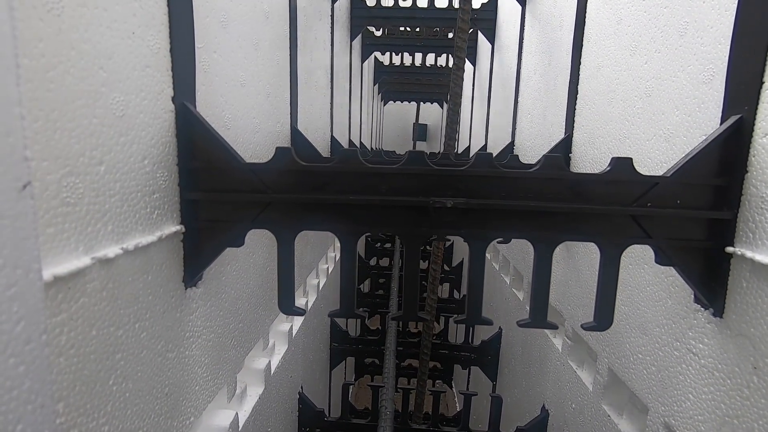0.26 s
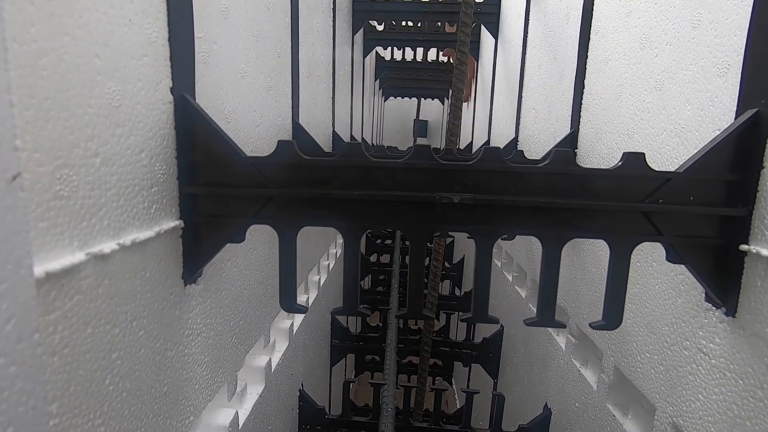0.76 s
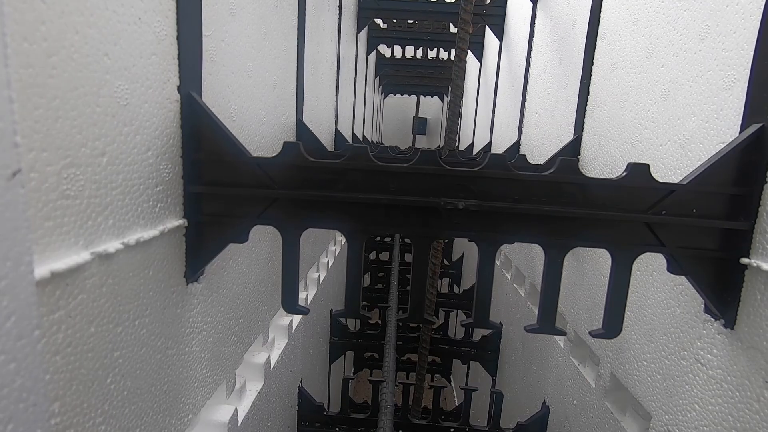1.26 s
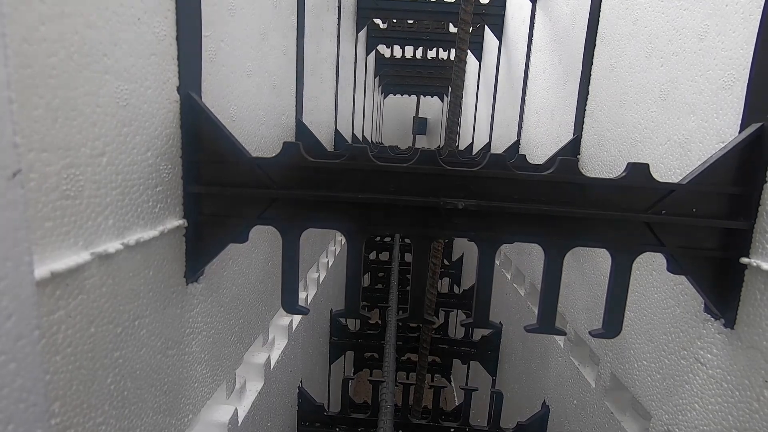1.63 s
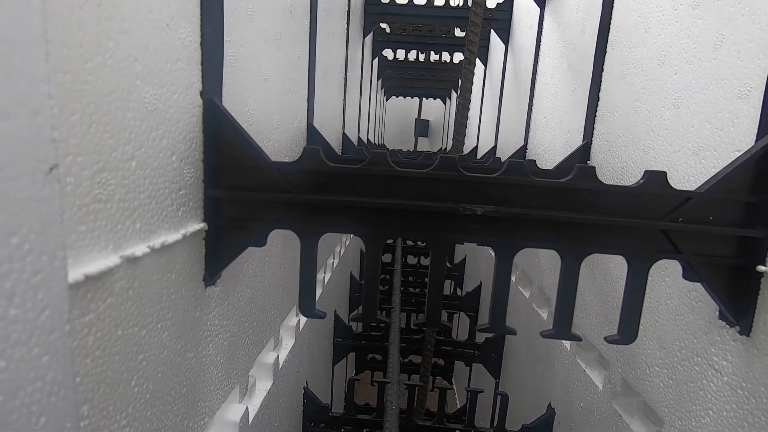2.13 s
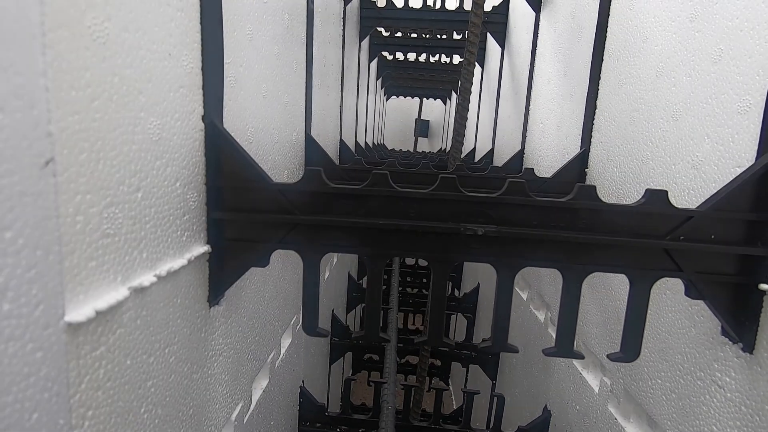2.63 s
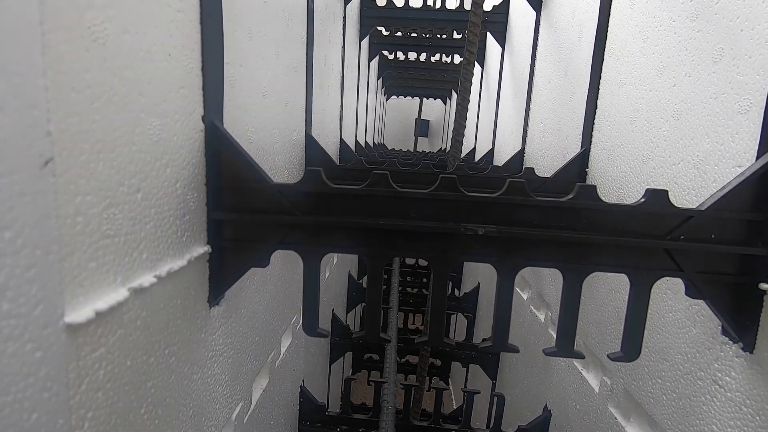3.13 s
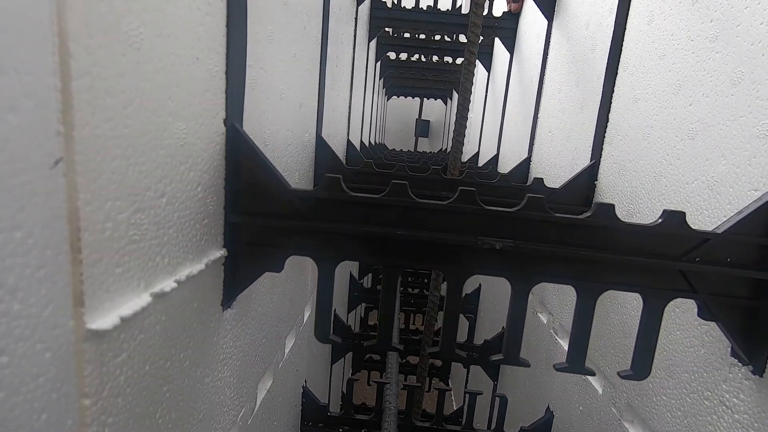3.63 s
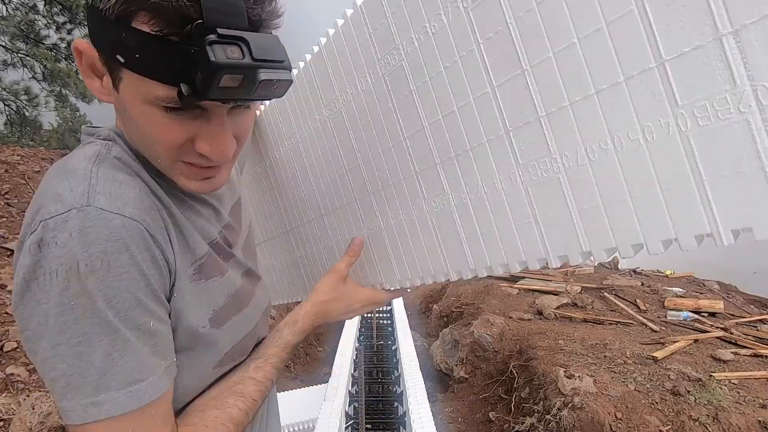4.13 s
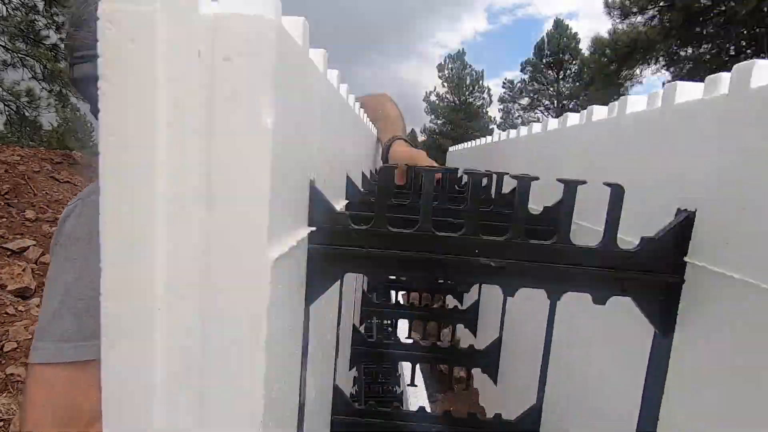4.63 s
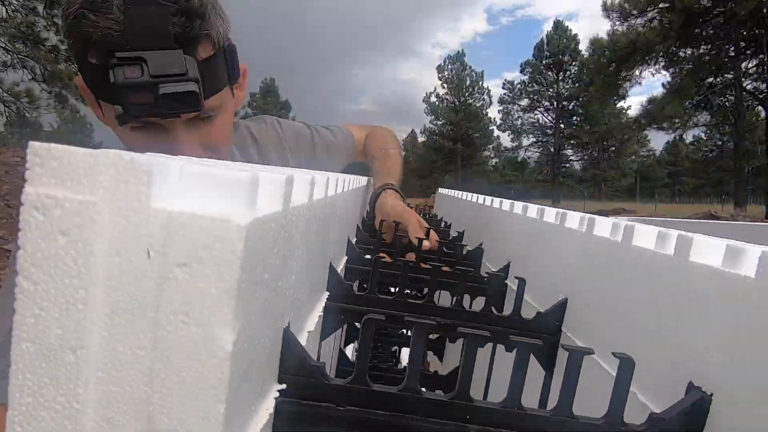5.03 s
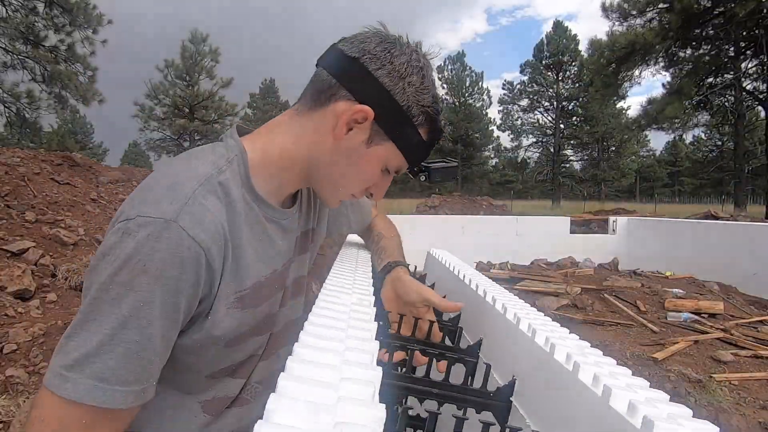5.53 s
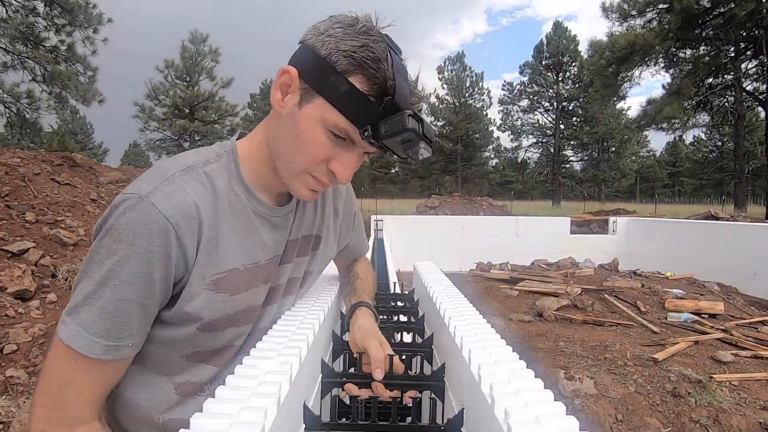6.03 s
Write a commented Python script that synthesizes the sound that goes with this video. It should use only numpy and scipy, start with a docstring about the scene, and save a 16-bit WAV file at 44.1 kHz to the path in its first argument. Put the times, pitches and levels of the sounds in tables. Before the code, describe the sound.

Loud irregular clacks and gritty scraping fill a narrow foam channel, the walls ringing low and boxy, with dry plastic ticks close to the microphone. Then an abrupt change to a drier outdoor site: a foam block is set down and pressed home with muffled bumps, low rumbling, crunchy rubs, tiny squeaks, sleeve rustle and light wind.

```python
"""Foam hisses and judders as a steel bar is worked along plastic webs inside a hollow foam wall form.
Bead slips make the hiss, knocks ring damped panels and boom in cavity modes, plastic creaks close by.
From 4.17 s, in the open air, a foam block is set on the wall and pressed home: resonant dull bumps,
rubbing, rumbling teeth, small squeaks and a sleeve rustle, over a breeze of coloured noise."""
import sys
import numpy as np
from scipy import signal
from scipy.fft import rfft, irfft, next_fast_len
from scipy.io import wavfile
from scipy.ndimage import uniform_filter1d, map_coordinates

SR = 44100
rng = np.random.default_rng(int(sys.argv[2]) if len(sys.argv) > 2 else 0)


def output_pcm(signal):
    """Save a mono or channel-first signal as 16-bit PCM at the path in sys.argv[1].

    Samples are clipped to [-1, 1] before scaling.
    """
    pcm = np.clip(np.atleast_2d(signal).T, -1, 1) * 32767
    wavfile.write(sys.argv[1], SR, np.round(pcm).astype(np.int16))


N = 276507

# strokes of the bar along foam and webs: start_s, end_s, swell_db (start to end), hiss_db, drag_db
BAR_STROKES = [(0.0, 0.12, -3, -38, -31.5), (0.162, 0.36, -0.5, -42, -37), (0.356, 0.558, -7, -61, -50),
               (0.587, 0.654, -2, -48, -25), (0.694, 0.836, -2, -52.5, -40.5), (0.851, 0.954, 3, -48, -42),
               (0.976, 1.114, 9, -43, -37), (1.12, 1.202, -1, -50.5, -37),
               (1.248, 1.278, -12.5, -41, -27.5), (1.284, 1.45, 10, -46.5, -34),
               (1.432, 1.479, -7, -39.5, -44), (1.557, 1.607, 0.5, -42.5, -37),
               (1.697, 1.738, -8, -47, -40), (1.768, 1.826, -9.5, -42.5, -32.5),
               (1.835, 1.931, 3.5, -50, -37), (1.977, 2.131, 2.5, -42, -33.5),
               (2.14, 2.203, 2.5, -45.5, -30), (2.232, 2.243, 4, -50.5, -35),
               (2.299, 2.438, -4.5, -46.5, -70), (2.511, 2.58, -20.5, -44.5, -48),
               (2.61, 2.618, 0, -57, -47), (2.665, 2.757, 6, -51, -43.5), (2.856, 2.967, -5, -45, -32),
               (3.015, 3.039, -1.5, -38, -49), (3.076, 3.22, -6, -49.5, -35.5),
               (3.223, 3.268, -2, -50, -30.5), (3.296, 3.308, -2, -43.5, -36),
               (3.406, 3.478, -10, -42, -29), (3.513, 3.562, -10, -50.5, -66), (3.621, 3.656, 9, -45, -44),
               (3.755, 3.86, 13, -46.5, -46), (3.924, 4.015, -1.5, -40.5, -34.5),
               (4.06, 4.119, 6, -44, -51), (4.147, 4.187, 3, -50, -61)]
# air and wall resonances of the cavity: mode_hz, width_hz, level_db
CAVITY_MODES = [(132.3, 20, -12), (237, 41.5, -0.5), (314.8, 81, -4), (395.2, 20, 1), (567, 64, -9),
                (698.6, 84, -6.5), (817, 120, -8), (1018, 380, -18.5)]
# colour of bead hiss: freq_hz, density_db
BEAD_COLOUR = [(500, 8.5), (1200, 1.5), (2200, 0.5), (4000, 6.5), (5000, 3), (7500, 2.5), (10300, 0),
               (12000, -4), (16000, -4.5)]
# colour of a rubbed panel: freq_hz, density_db
PANEL_COLOUR = [(60, -57), (180, -6.5), (300, 2), (480, -4.5), (730, 2), (870, -7.5), (1000, -4.5),
                (1550, -15), (2600, -35)]

STROKE_RISE_S, STROKE_FALL_S, DRAG_FALL_S = 0.024, 0.045, 0.2  # 60 dB times
PUSH_RISE_S, PUSH_FALL_S = 0.11, 0.11  # 60 dB times
RESTING_DB = -68  # foam or sleeve that is only held


def amp(db):
    """Decibels to gain."""
    return 10 ** (np.asarray(db) / 20)


def unit(x):
    """Scale to rms 1."""
    return x / np.sqrt(np.mean(x ** 2) + 1e-20)


def along(points, hz):
    """(Hz, value) points read on a log axis."""
    f, v = np.transpose(points)
    return np.interp(np.log(hz + 1), np.log(f), v)


def wobble(rate_hz):
    """Smooth random curve with rate_hz knots a second."""
    return map_coordinates(rng.standard_normal(int(N * rate_hz / SR) + 4), [np.arange(N) * rate_hz / SR])


def filtered(x, response):
    """x times a response of frequency."""
    n = x.shape[-1]
    m = next_fast_len(n + 8192)
    return irfft(rfft(x, m) * response(np.fft.rfftfreq(m, 1 / SR)), m)[..., :n]


def coloured(x, spectrum):
    """x shaped by (Hz, dB) points, at rms 1."""
    return unit(filtered(x, lambda hz: amp(along(spectrum, hz))))


def resonances(modes, hz):
    """Response of a body with (Hz, width Hz, dB) modes of alternating sign."""
    total = 0
    for k, (centre, width, db) in enumerate(modes):
        damping = 1j * hz * width
        total = total + (-1) ** k * amp(db) * damping / (centre * centre - hz * hz + damping)
    return total


def grains(rate_hz, spread_db):
    """Tiny slips at random times, of random sign and log-normally spread size, at rms 1."""
    happens = rng.random(N) < rate_hz / SR
    return unit(happens * rng.standard_normal(N) * amp(spread_db * rng.standard_normal(N)))


def fade(t, t60):
    """Gain that falls 60 dB in t60."""
    return np.exp(-np.log(1000) * t / t60)


def add(track, s, sound):
    """Mix a sound into a track at s seconds; a negative start is moved to zero."""
    part = track[..., max(round(s * SR), 0):][..., :sound.shape[-1]]
    part += sound[..., :part.shape[-1]]


def moves(rows, rise_s, fall_s):
    """Gain of hand moves (start_s, end_s, swell_db, level_db): each sets in, swells evenly, dies away."""
    power = np.zeros(N)
    for start, end, swell_db, db in rows:
        t = np.arange(max(start - rise_s, 0), end + fall_s, 1 / SR)
        progress = np.interp(t, [start, end], [-.5, .5])
        edges = fade(np.maximum(start - t, 0), rise_s) * fade(np.maximum(t - end, 0), fall_s)
        add(power, t[0], (amp(db + swell_db * progress) * edges) ** 2)
    return np.sqrt(power)


def patchy(x, depth_db, band_size, time_size):
    """x with its colour shifting from moment to moment; sizes count 170 Hz bands and 3 ms frames."""
    z = signal.stft(x, nperseg=256)[2]
    field = rng.standard_normal(z.shape)
    for axis, size in 2 * [(0, band_size), (1, time_size)]:
        field = uniform_filter1d(field, size, axis, mode="wrap")
    return unit(signal.istft(z * amp(depth_db * unit(field)), nperseg=256)[1][:len(x)])


def between_walls(x, t60, echo_db):
    """Close reflections between the panels comb the sound."""
    t = np.arange(SR // 30) / SR
    echoes = rng.standard_normal(len(t)) * fade(t, t60)
    return unit(x + amp(echo_db) * unit(signal.fftconvolve(x, echoes)[:N]))


def friction(inside):
    """How hard foam is being rubbed, by the bar or by the block."""
    # rubs of the block on the course below: start_s, end_s, swell_db, hiss_db
    rubs = [(4.246, 4.262, -1, -41), (4.28, 4.304, 8, -48.5), (4.32, 4.64, 3, -60), (4.857, 4.885, -5, -33),
            (4.9, 4.93, -2, -44.5), (4.943, 4.963, 2, -36.5), (5.04, 5.09, 0, -43), (5.12, 5.14, 4, -43),
            (5.228, 5.255, 1, -50), (5.345, 5.42, -6, -49.5), (5.467, 5.505, -12, -51),
            (5.516, 5.54, -1, -36), (5.55, 5.583, -6, -53.5), (5.67, 5.75, -4, -43.5),
            (5.78, 6.085, -4, -41.3), (6.09, 6.18, 0, -40)]
    strokes = [(start, end, swell, hiss) for start, end, swell, hiss, drag in BAR_STROKES]
    held = amp(RESTING_DB) * (1 - inside / 2)
    return moves(strokes + list(rubs), STROKE_RISE_S, STROKE_FALL_S) + held


def rubbing(inside, pressure, hiss_db=-1, bar_flutter_db=1.3, block_flutter_db=2.0):
    """Beads catch and slip thousands of times a second, less evenly under the block; inside, a panel roars."""
    beads = between_walls(grains(9000, spread_db=3.2), t60=.03, echo_db=-8)
    shifting = patchy(beads, depth_db=2.5, band_size=7, time_size=8)
    roar = inside * coloured(grains(2600, spread_db=3.0), PANEL_COLOUR)
    flutter_db = (bar_flutter_db * inside + block_flutter_db * (1 - inside)) * wobble(120)
    return pressure * amp(hiss_db + flutter_db) * (coloured(shifting, BEAD_COLOUR) + roar)


def drag_force():
    """How hard the bar drags on the webs."""
    drags = [(start, end, swell, drag) for start, end, swell, hiss, drag in BAR_STROKES]
    return moves(drags, STROKE_RISE_S, DRAG_FALL_S)


def dragging(force, drag_db=-3, judder_db=5.0, ring_db=-7):
    """The bar sticks and slips on the webs; the panels answer and the cavity rings."""
    slips = grains(1500, spread_db=0.5) * amp(judder_db * wobble(40))
    panels = coloured(slips, PANEL_COLOUR)
    cavity = unit(filtered(slips, lambda hz: resonances(CAVITY_MODES, hz)))
    return force * (amp(drag_db) * panels + amp(ring_db) * cavity)


def wall_shake(force, shake_db=-1, follow_db=-18, hold_s=0.015):
    """The whole wall rumbles: a little while the bar drags, more after each jolt."""
    # jolts of the wall: start_s, level_db
    jolt_rows = [(0.385, -47), (1.1, -35), (1.6, -42), (2.06, -36.5), (2.5, -25.5), (2.56, -43),
                 (3.07, -34), (3.23, -33), (3.42, -36.5), (3.935, -36)]
    # colour of the shaking wall: freq_hz, density_db
    wall_colour = [(20, -30), (50, -9.5), (85, -1.5), (160, -4), (300, -68)]
    jolts = moves([(s, s + hold_s, 0, db) for s, db in jolt_rows], rise_s=0.15, fall_s=0.41)
    return (amp(shake_db) * jolts + amp(follow_db) * force) * coloured(rng.standard_normal(N), wall_colour)


def breeze(level_db=-55, gust_db=0.88):
    """Light wind in the trees: coloured noise with a slow, slight swell."""
    # colour of wind: freq_hz, density_db
    wind_colour = [(25, -3), (90, 5), (190, -14), (320, -5), (600, -1.5), (1200, -5.5), (2200, -13.5),
                   (5000, -23), (16000, -47)]
    return coloured(rng.standard_normal(N), wind_colour) * amp(gust_db * wobble(2.3) + level_db)


def skids(hiss_db=-2, width=0.17, body_db=-4):
    """A skid swells and stops; the patch it crosses favours one band, and the panel roars below."""
    # skids over foam: peak_s, hiss_db, rise_s and fall_s (30 dB times), band_hz, band_db
    skid_rows = [(0.058, -50, 0.06, 0.071, 5000, -49), (0.333, -50, 0.13, 0.023, 11000, -41),
                 (0.583, -23, 0.021, 0.021, 6150, -29.5), (1.036, -36, 0.042, 0.018, 650, -26),
                 (1.077, -22, 0.046, 0.026, 3580, -35), (1.250, -30, 0.015, 0.019, 6000, -54),
                 (1.704, -50, 0.012, 0.017, 1000, -18), (1.728, -34, 0.014, 0.039, 8900, -38),
                 (1.996, -29.5, 0.031, 0.021, 3600, -38), (2.493, -14, 0.041, 0.015, 4500, -37),
                 (3.078, -30, 0.02, 0.037, 9250, -41), (3.266, -35.5, 0.018, 0.056, 10500, -35.5),
                 (3.413, -36, 0.013, 0.043, 1660, -28.5), (3.429, -27, 0.014, 0.0066, 2090, -23.5),
                 (3.472, -48, 0.05, 0.032, 10400, -41.5), (3.576, -26, 0.04, 0.06, 3570, -31.5),
                 (3.588, -24, 0.031, 0.012, 10600, -21), (3.902, -35.5, 0.0052, 0.013, 2520, -41),
                 (6.143, -25.5, 0.026, 0.024, 3900, -46)]
    t = np.arange(-SR // 8, SR // 5) / SR
    track = np.zeros(N)
    for s, db, rise, fall, hz, favoured_db in skid_rows:
        beads, patch, panel = rng.standard_normal((3, len(t)))
        band = unit(filtered(patch, lambda f: 1 / (1 + ((f - hz) / (width * hz)) ** 2)))
        hiss = amp(hiss_db) * coloured(beads, BEAD_COLOUR)
        roar = amp(body_db) * coloured(panel, PANEL_COLOUR)
        swell = fade(np.abs(t), 2 * np.where(t < 0, rise, fall))
        # a skid within 1/8 s of the start peaks at 1/8 s
        add(track, s + t[0], swell * (amp(db) * (hiss + roar) + amp(favoured_db) * band))
    return track


def boom(struck_hz, favour_db=3.5, scatter=0.07, drift_rad=0.054, build_s=0.0016):
    """Channel modes, shifted by where the blow lands, ring on; those near its pitch most, bass longest."""
    # decay of the cavity: freq_hz, t60_s
    cavity_t60 = [(100, 0.79), (280, 0.33), (700, 0.17), (1800, 0.042), (8000, 0.04)]
    t = np.arange(SR // 2) / SR
    tail = np.zeros(len(t))
    for hz, width, db in CAVITY_MODES:
        pitch = hz * np.exp(scatter * rng.standard_normal())
        phase = 2 * np.pi * (pitch * t + rng.random()) + drift_rad * np.cumsum(rng.standard_normal(len(t)))
        level = amp(db - favour_db * abs(np.log2(hz / struck_hz))) * np.sqrt(width)  # favour_db an octave
        tail += level * np.sin(phase) * fade(t, along(cavity_t60, hz))
    tail = filtered(tail * (1 - np.exp(-t / build_s)), lambda f: 1 / (1 + (f / 1400) ** 6))
    return tail / np.std(tail[:SR // 20])


def blows(table, cycles, crack_db, boom_db, crack_t60, grit_db, contact_reach=3.45):
    """Each blow rings a damped foam panel for a few cycles, grates on the beads and booms in the cavity."""
    # colour of web rattle: freq_hz, density_db
    scrape_colour = [(30, -26), (150, -6), (260, 7.5), (350, -9), (470, 0.5), (720, 7), (1050, -6),
                     (1500, -0.5), (2200, -22), (5000, -39)]
    track, t = np.zeros(N), np.arange(SR // 2) / SR
    give = 1 - np.exp(-(t / .0016) ** 2)  # foam yields before it rings
    for s, db, hz, tail_db in table:
        ring = np.sin(2 * np.pi * hz * t) * fade(t, cycles / hz) * give
        contact = fade(t, crack_t60) * give
        dull = lambda f: 1 / (1 + (f / (contact_reach * hz)) ** 4)  # low blows are duller
        crack = amp(crack_db) * filtered(coloured(rng.standard_normal(len(t)), scrape_colour), dull)
        # light blows are grittier
        grit = amp(grit_db - db / 2) * coloured(rng.standard_normal(len(t)), BEAD_COLOUR)
        tail = amp(tail_db + boom_db) * boom(hz)
        add(track, s, amp(db) * (ring / np.abs(ring).max() + contact * (crack + grit) + tail))
    return track


def bar_knocks():
    """The bar strikes the webs, and the channel booms."""
    # bar against the webs: start_s, ring_peak_db, ring_hz, boom_db (relative)
    knock_rows = [(0.030, -17.5, 332, -3), (0.580, -7.5, 835, -6), (0.581, -3.5, 354, -17),
                  (0.592, -7.5, 390, 0.5), (0.987, -26, 472, 3), (1.036, -15.5, 656, 1),
                  (1.066, -14, 366, -5.5), (1.249, -31, 540, 3), (1.581, -7.5, 338, -11),
                  (1.583, -15, 614, -18), (1.595, -12.5, 246, -13), (1.609, -20.5, 139, -22),
                  (1.701, -11, 743, -6.5), (1.708, -18, 1050, -5), (1.726, -7.5, 694, -20),
                  (1.730, -6.5, 382, -14.5), (1.778, -5, 379, -20), (1.780, -20.5, 770, 2),
                  (1.985, -24.5, 804, 2), (2.026, -22.5, 380, 2.5), (2.142, -14.5, 305, -1.5),
                  (2.204, -17.5, 334, -16), (2.474, -17, 577, -7), (2.495, -8.5, 736, -0.5),
                  (2.499, -10.5, 224, -4.5), (2.730, -26.5, 764, -9), (3.022, -16.5, 830, -2),
                  (3.081, -13.5, 305, -7), (3.141, -24, 716, -9), (3.262, -21, 846, -5.5),
                  (3.411, -10.5, 895, -6), (3.415, -10, 654, -3), (3.426, -14, 460, -10),
                  (3.436, -3.5, 854, -19), (3.443, -15, 410, -26), (3.575, -21, 1000, -7),
                  (3.592, -10.5, 994, -9.5), (3.597, -4, 327, -17), (3.633, -18, 338, -2),
                  (3.903, -18, 513, -1)]
    return blows(knock_rows, cycles=17.7, crack_db=-8.5, boom_db=-9, crack_t60=0.042, grit_db=-62.0)


def chirps(table, t60, rasp_rad, snap_db, upper_db, upper_ratio=1.38, snap_t60=0.015):
    """A short slip starts with a snap and rings a rough resonance and a weaker one above it."""
    track, t = np.zeros(N), np.arange(SR // 20) / SR
    for s, db, hz in table:
        phase = 2 * np.pi * (hz * t + rng.random()) + rasp_rad * np.cumsum(rng.standard_normal(len(t)))
        ring = (np.sin(phase) + amp(upper_db) * np.sin(upper_ratio * phase)) * fade(t, t60)
        snap = amp(snap_db) * rng.standard_normal(len(t)) * fade(t, snap_t60)
        add(track, s, amp(db) * (ring + snap) * (1 - np.exp(-t / 0.00034)))
    return track


def squeaking():
    """Foam slips in short, rough squeaks."""
    # squeaks of foam: start_s, level_db, pitch_hz
    squeak_rows = [(0.581, -13, 1500), (1.582, -25, 1570), (5.062, -26, 1070), (5.725, -25, 6500),
                   (5.737, -18.5, 6820), (5.738, -24, 3360), (5.747, -30, 2750), (5.908, -29, 6400),
                   (6.087, -22, 805)]
    return chirps(squeak_rows, t60=0.018, rasp_rad=0.21, snap_db=-14, upper_db=-18)


def creaking(ring_hz=2550):
    """Each tick rings the same piece of plastic, so close that it reaches the left microphone first."""
    # ticks of a creaking web: start_s, level_db
    creak_rows = [(0.655, -13.5), (0.753, -34), (2.015, -20), (2.021, -23), (2.040, -19), (2.044, -19),
                  (2.053, -19), (2.057, -9.5), (2.156, -26)]
    ticks = chirps([(s, db, ring_hz) for s, db in creak_rows],
                   t60=0.022, rasp_rad=0.11, snap_db=-13.5, upper_db=-11.5)
    return np.array([ticks, np.roll(ticks, 7)])  # right lags by 7 samples


def crunching(rate_hz=1400, middle_hz=4300, spread=0.37, cycles=8, clump_db=6.0):
    """Crushed beads give way in clumps, each with a tiny squeak at its own pitch."""
    # foam crushed under pressure: start_s, end_s, level_db
    crunch_rows = [(1.989, 2.202, -51), (3.138, 3.272, -44.5), (5.011, 5.082, -50), (5.685, 5.975, -45)]
    track, t = np.zeros(N), np.arange(SR // 60) / SR
    for start, end, db in crunch_rows:
        length_s = end - start
        burst = np.zeros(round(length_s * SR))
        for when, pitch, size in rng.random((round(rate_hz * length_s), 3)):
            hz = middle_hz * np.exp(spread * (4 * pitch - 2))
            add(burst, when * length_s, size ** 2 * np.sin(2 * np.pi * hz * t) * fade(t, cycles / hz))
        add(track, start, amp(db) * unit(burst * amp(clump_db * wobble(90.9)[:len(burst)])))
    return track


def chatter(count=8, start_s=2.755, gap_s=.0256, first_db=-16, loss_db=1.96, ring_hz=752):
    """The bar chatters over a web in even slips, each weaker than the last."""
    slips = [(start_s + k * gap_s, first_db - k * loss_db, ring_hz, -6) for k in range(count)]
    return blows(slips, cycles=19, crack_db=-10.5, boom_db=-6.0, crack_t60=0.082, grit_db=-27.0)


def push_effort():
    """How hard the hands push and flex the block."""
    # pushes: start_s, end_s, swell_db, level_db
    push_rows = [(4.19, 4.24, -2, -40.5), (4.265, 4.345, 0.5, -25), (4.39, 4.555, 0.5, -28),
                 (4.86, 4.89, 9, -35.5), (4.92, 5.11, 6, -42), (5.15, 5.2, -2, -19), (5.315, 5.49, -9, -41),
                 (5.53, 5.6, -6, -35.5), (5.62, 5.82, 1, -28), (5.85, 6.035, 1.5, -24),
                 (6.05, 6.11, -3, -32), (6.143, 6.175, 1, -27.5), (6.2, 6.27, 7, -35.5)]
    return moves(push_rows, PUSH_RISE_S, PUSH_FALL_S)


def flexing(effort, flex_db=-2.0, lumps_db=1.5):
    """The light block rumbles as its teeth ride into the course below."""
    # colour of the flexing block: freq_hz, density_db
    block_colour = [(20, -7.5), (55, 1.5), (130, 2), (330, -6), (650, -32), (3000, -80)]
    rumble = coloured(grains(2000, spread_db=0.0), block_colour)
    return effort * amp(flex_db) * unit(rumble * amp(lumps_db * wobble(30)))


def grinding(effort, grind_db=-11, catch_db=4.5, soft_hz=1000):
    """The block's teeth catch unevenly on the course below and ring panels; foam is too soft to click."""
    # panel resonances of the loose block: mode_hz, width_hz, level_db
    block_modes = [(365, 130, 3), (610, 250, -5), (890, 410, -8)]
    slips = grains(900, spread_db=1.5) * amp(catch_db * wobble(50))
    panels = filtered(slips, lambda hz: resonances(block_modes, hz) / (1 + (hz / soft_hz) ** 4))
    return effort * amp(grind_db) * unit(panels)


def sleeve(outside, waver_db=2):
    """A sleeve brushes along as the arms move, as a soft high rustle."""
    # swishes: start_s, end_s, level_db
    swish_rows = [(4.267, 4.36, -55), (4.39, 4.513, -59.5), (4.59, 4.623, -51.5), (4.773, 4.795, -50.5),
                  (5.468, 5.487, -49), (6.242, 6.27, -55)]
    # colour of cloth: freq_hz, density_db
    cloth_colour = [(3000, -17), (6000, 5.5), (7500, 5), (9300, 7), (11500, -12), (16000, -9)]
    wavering = patchy(rng.standard_normal(N), depth_db=4.5, band_size=9, time_size=16)
    swishes = moves([(start, end, 0, db) for start, end, db in swish_rows], STROKE_RISE_S, PUSH_FALL_S)
    brushing = swishes + amp(RESTING_DB) * outside
    return brushing * amp(waver_db * wobble(35)) * coloured(wavering, cloth_colour)


def block_bumps():
    """The block bumps dully onto the wall."""
    # block against the wall: start_s, ring_peak_db, ring_hz, boom_db (relative)
    bump_rows = [(4.297, -19.5, 427, -23), (4.343, -19, 236, -16), (4.488, -26, 577, -12),
                 (4.862, -21, 104, -29), (5.147, -19.5, 173, 2), (5.170, -18.5, 360, -22),
                 (5.191, -14, 281, -18), (5.258, -20.5, 85.5, -28), (5.625, -20, 305, 1.5),
                 (5.635, -13.5, 335, -7.5), (6.141, -22, 294, -24)]
    return blows(bump_rows, cycles=7.9, crack_db=-15.5, boom_db=-14.5, crack_t60=0.034, grit_db=-43)


def scene(outside_s=4.17):
    """Bar inside the form, then block outside; all is centred but the creaks."""
    outside = np.clip((np.arange(N) / SR - outside_s) * 20, 0, 1)  # 50 ms crossing
    inside = 1 - outside
    pressure, force, effort = friction(inside), drag_force(), push_effort()
    bar = bar_knocks() + chatter() + dragging(force) + wall_shake(force)
    block = block_bumps() + flexing(effort) + grinding(effort) + sleeve(outside)
    foam = rubbing(inside, pressure) + skids() + crunching() + squeaking()
    return bar + block + foam + creaking() + breeze()


def record(dry, top_hz=15900):
    """The recorder rounds off the tallest peaks and keeps nothing above its band limit."""
    rounded = dry / (1 + np.abs(dry / .9) ** 6) ** (1 / 6)
    return filtered(rounded, lambda hz: hz < top_hz)


dry = scene()
out = record(dry)
output_pcm(out)
```